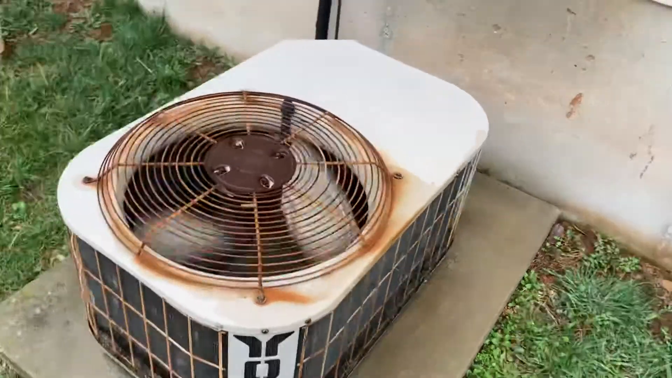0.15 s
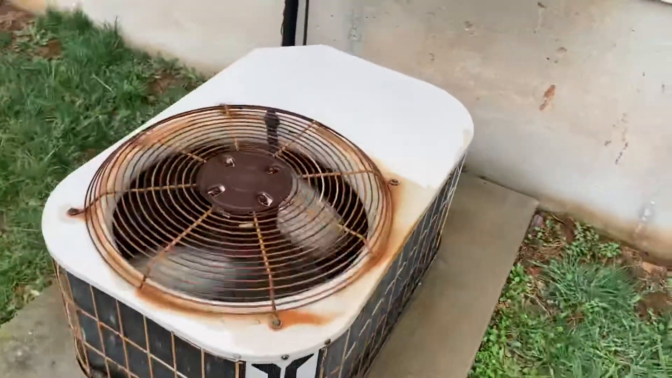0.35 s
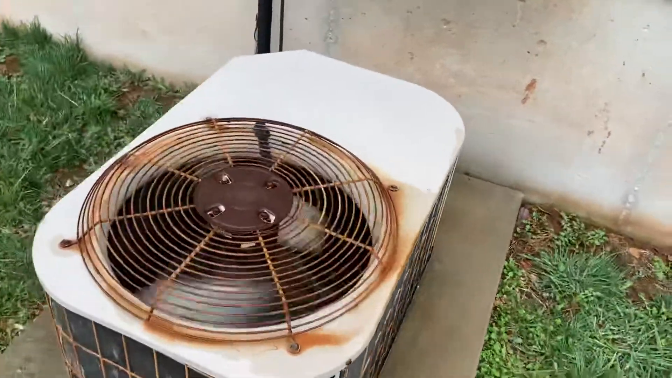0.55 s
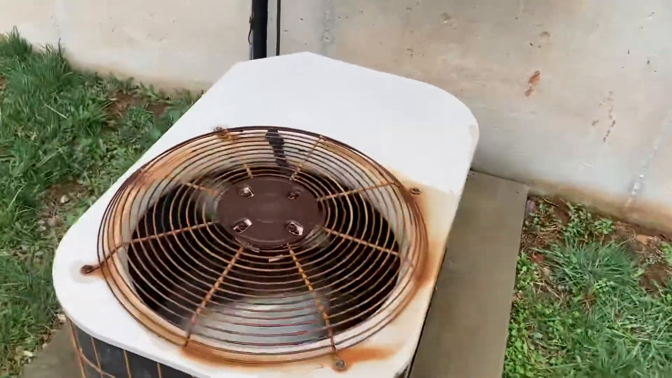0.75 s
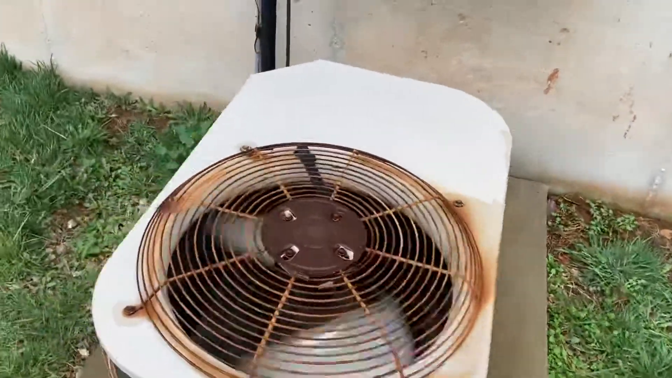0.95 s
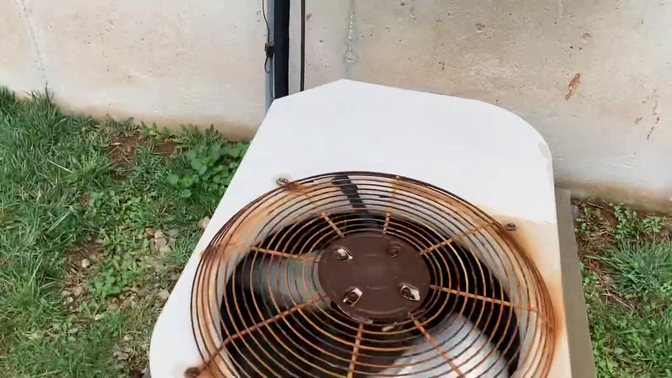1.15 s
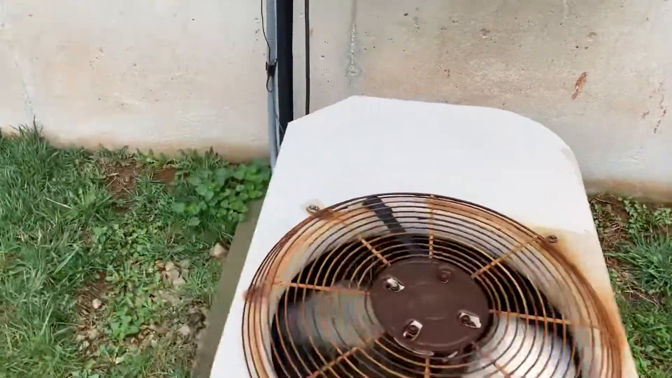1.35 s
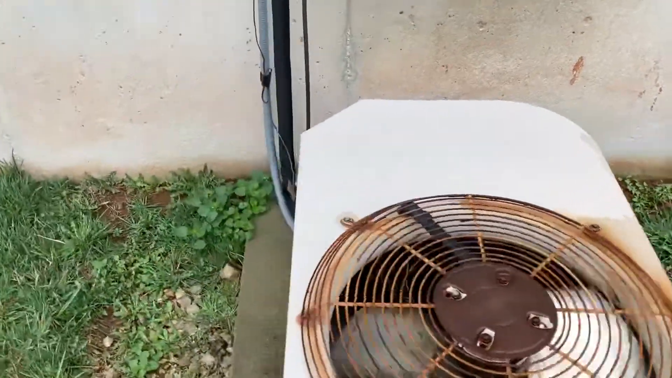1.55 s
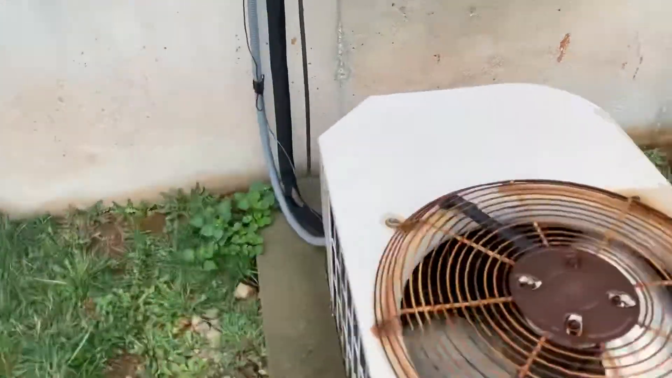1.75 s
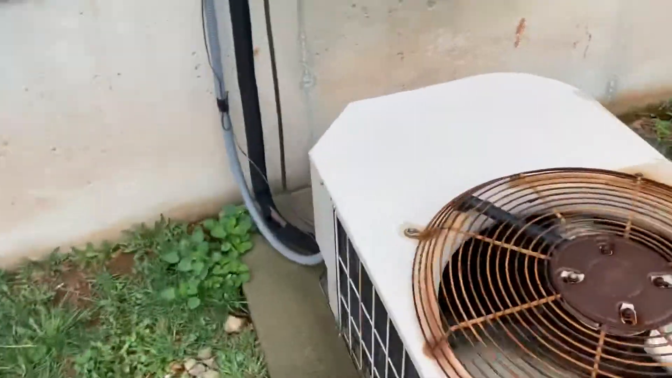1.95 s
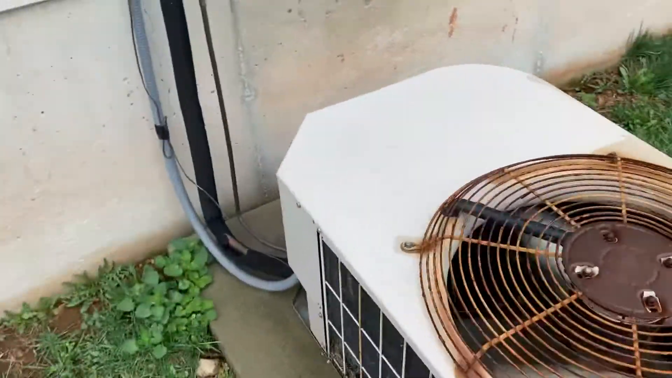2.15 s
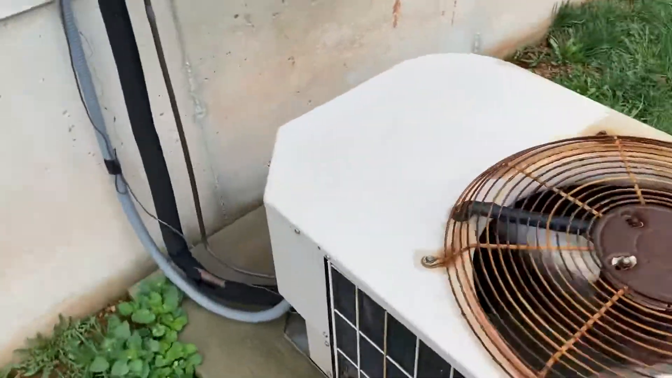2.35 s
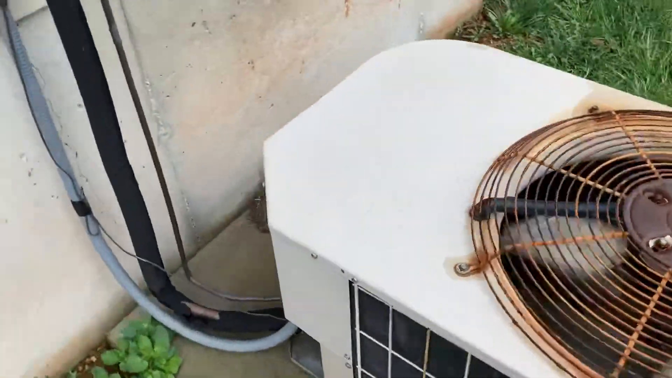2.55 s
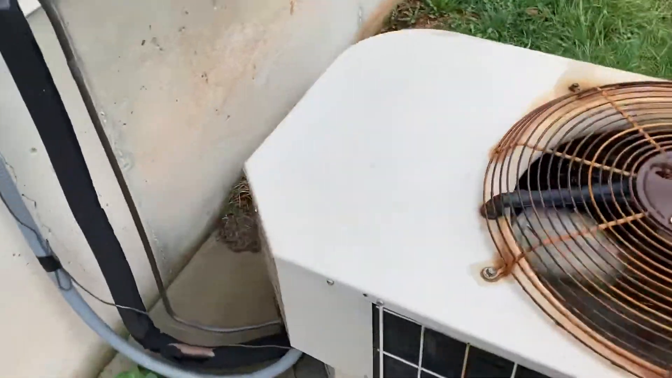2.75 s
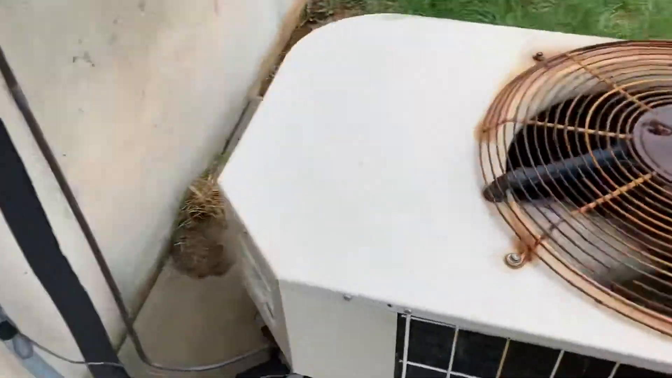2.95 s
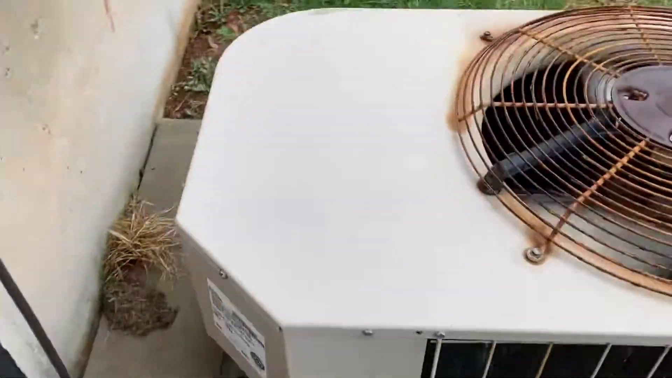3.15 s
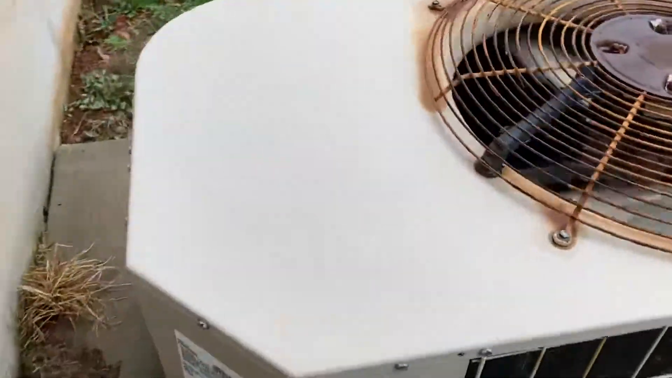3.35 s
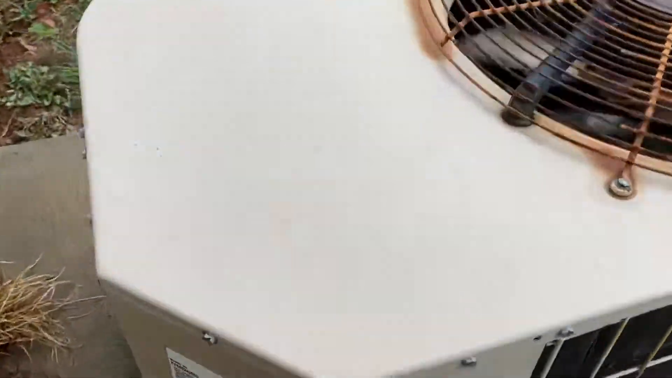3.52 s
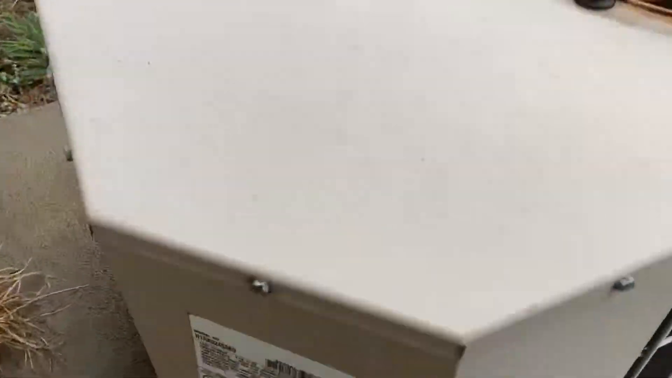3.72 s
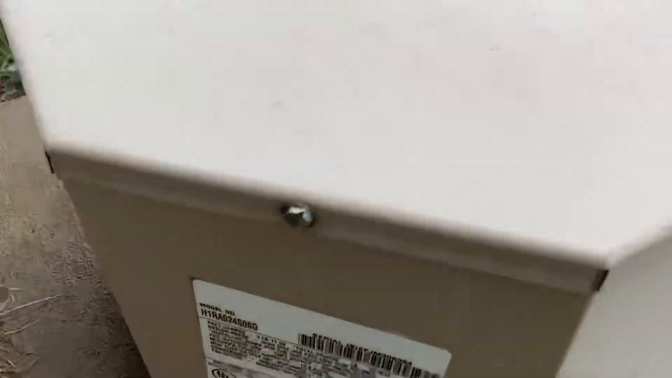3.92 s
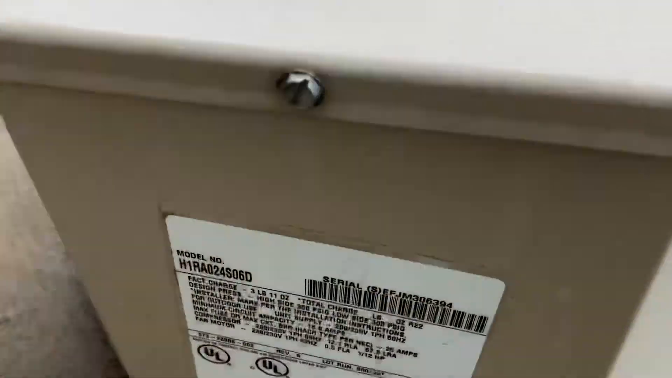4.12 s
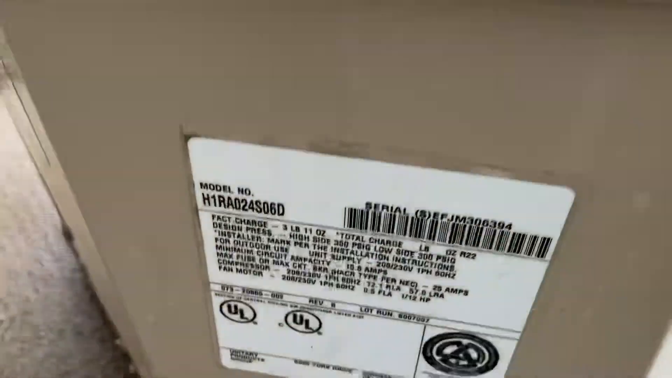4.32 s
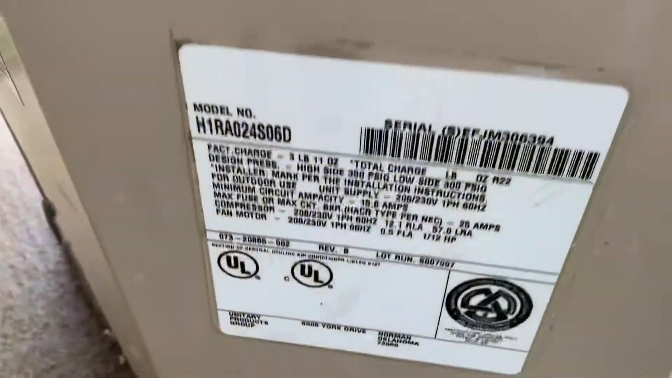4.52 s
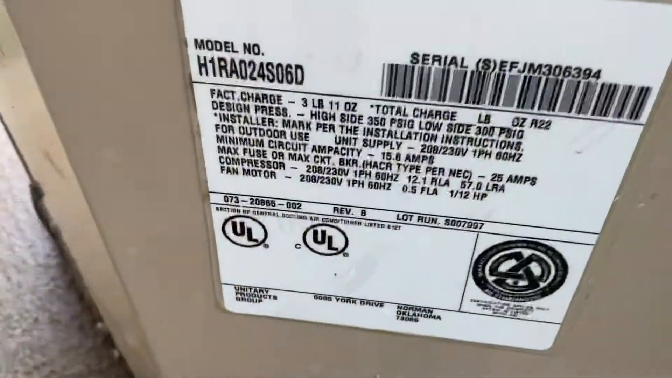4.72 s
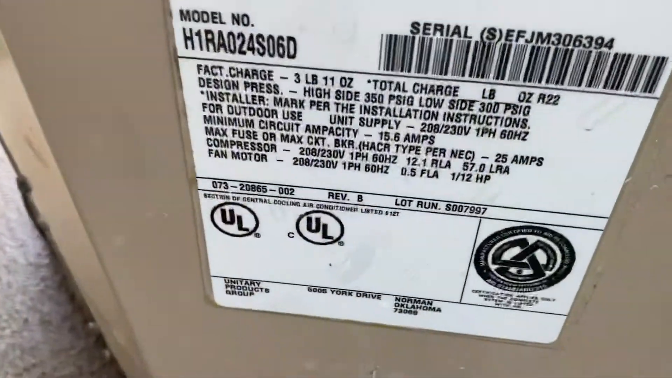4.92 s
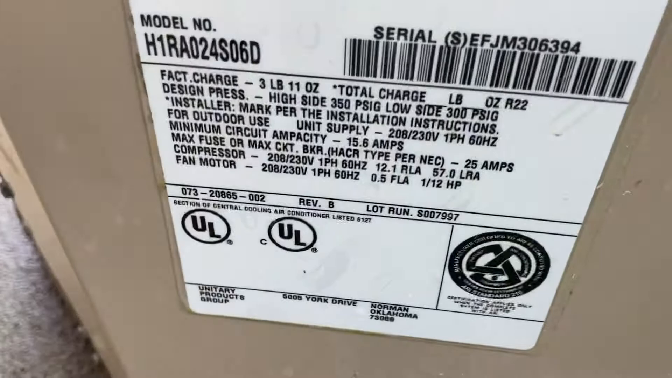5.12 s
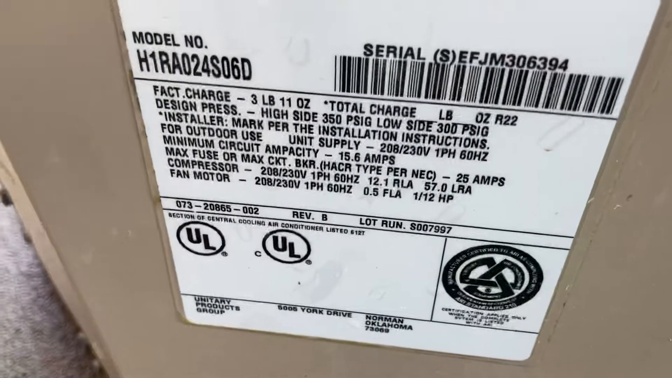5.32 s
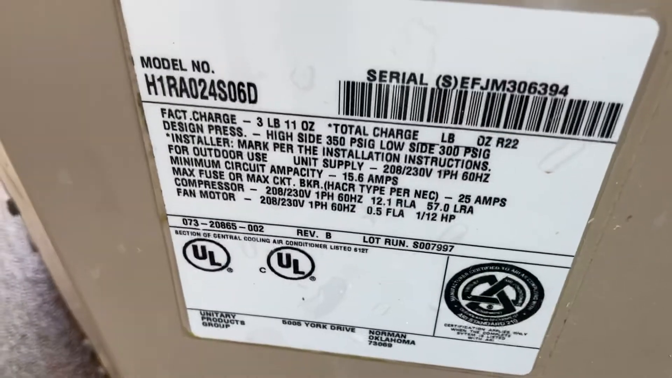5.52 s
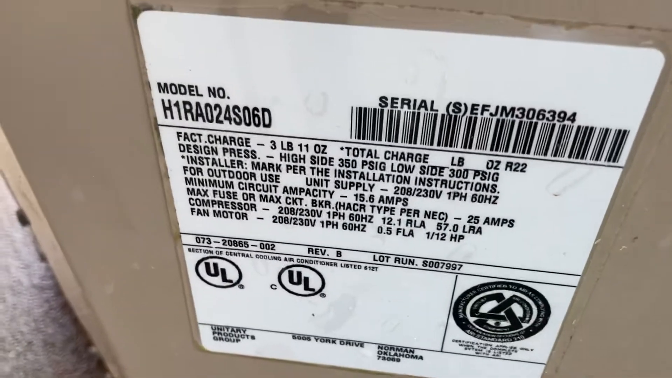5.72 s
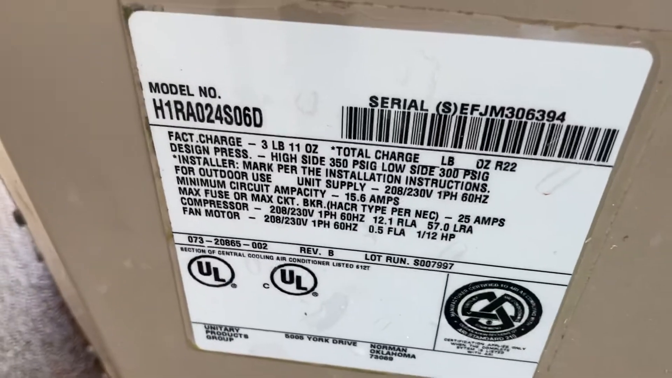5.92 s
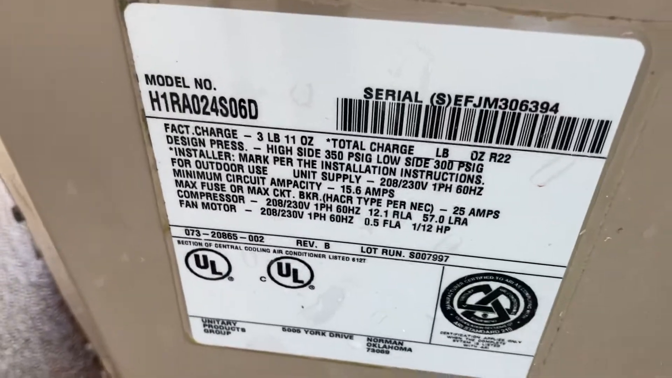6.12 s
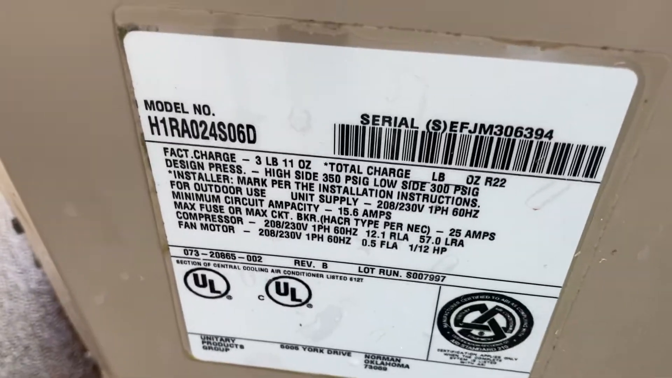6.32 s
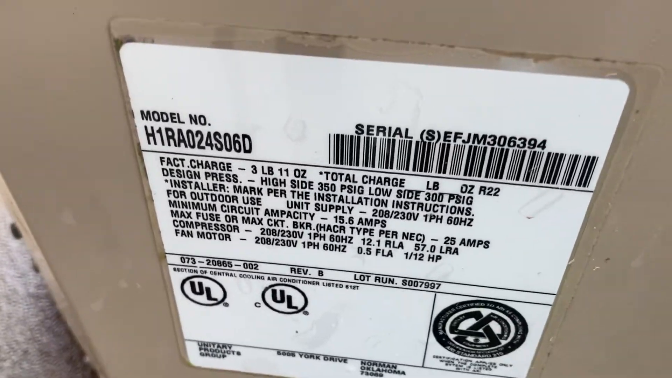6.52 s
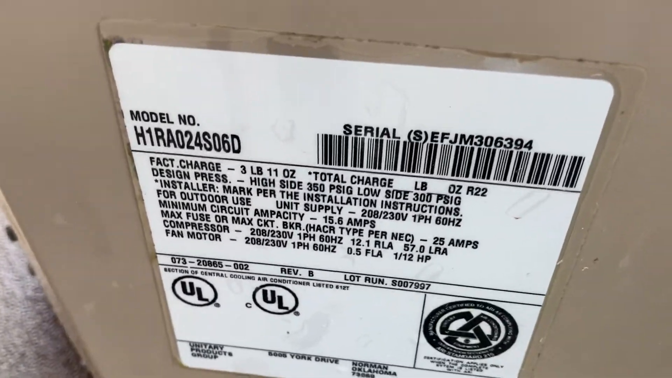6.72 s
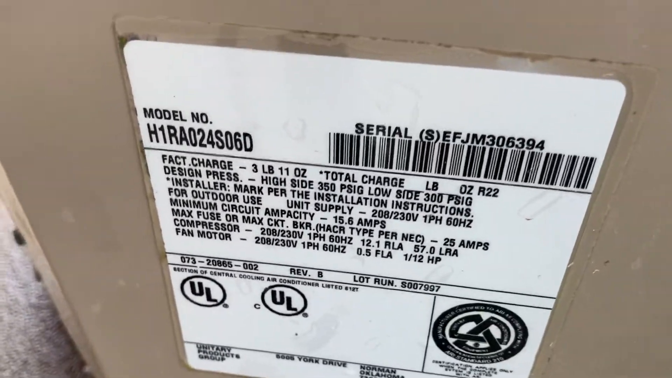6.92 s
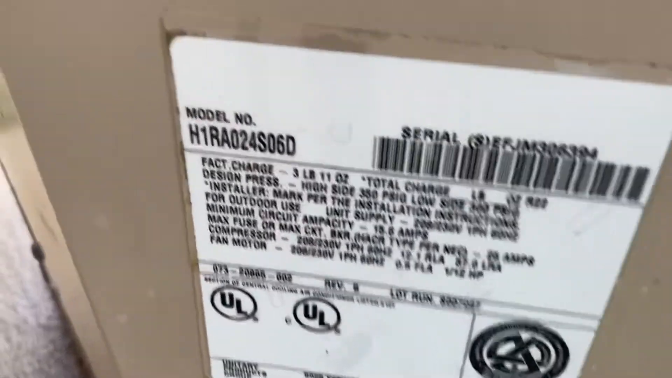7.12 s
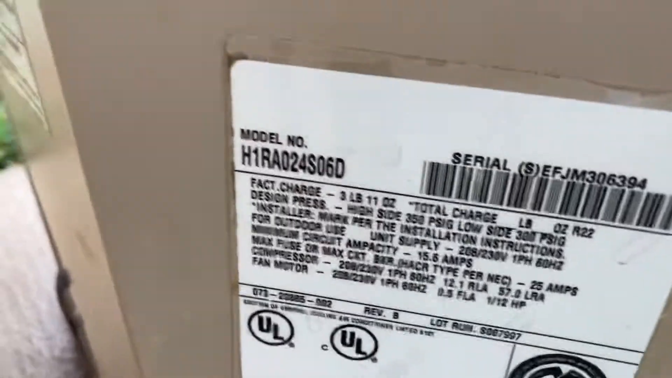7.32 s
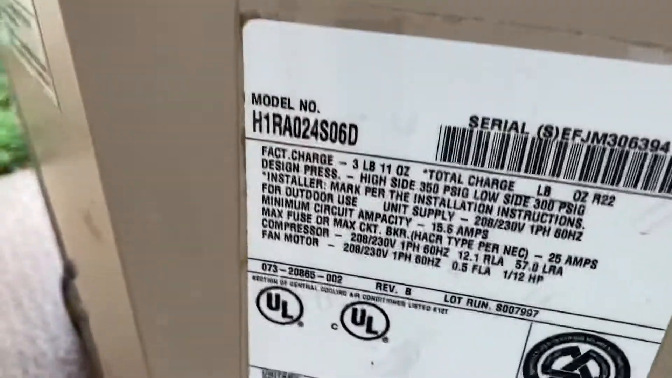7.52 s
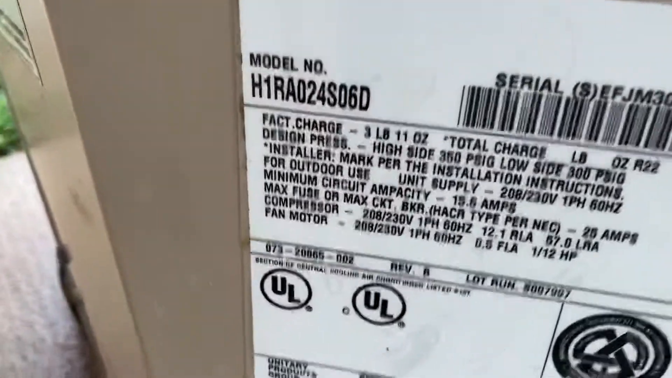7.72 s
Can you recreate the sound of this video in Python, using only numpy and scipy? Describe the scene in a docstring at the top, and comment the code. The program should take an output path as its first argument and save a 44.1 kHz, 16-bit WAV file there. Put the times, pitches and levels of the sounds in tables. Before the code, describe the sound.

Outdoors beside a house wall, a handheld phone passes over a running condenser unit. Fan air rushes over a buzzing compressor and faint metallic whine. From about one and a half seconds exhaust buffets the microphone in ragged low thumps, easing by four seconds. Small dry ticks and rustles follow, and close to the side panel the hum becomes deeper, stronger and steady.

```python
"""Walk past an outdoor condenser

A condenser unit runs steadily while a phone is carried over its fan grille, round a corner and down to
the side panel. The fan gives rushing air (shaped noise) and blade tones (sines on its shaft speed).
The compressor buzzes in partials of its shaft speed, hums, and rings the casing once a turn.
Exhaust buffets the microphone on the way past (low noise in gusts); dry ticks are tiny bursts of noise."""
import sys
import numpy as np
from scipy import signal
from scipy.fft import rfft, irfft, next_fast_len
from scipy.io import wavfile
from scipy.ndimage import uniform_filter1d, map_coordinates

SR = 44100
rng = np.random.default_rng(int(sys.argv[2]) if len(sys.argv) > 2 else 0)


def persist_wave(psi):
    """Save psi, clipped to +-1, as 16-bit WAV."""
    counts = np.round(np.clip(psi, -1, 1) * 32767).astype(np.int16)
    wavfile.write(sys.argv[1], SR, np.atleast_2d(counts).T)


N = 347067
TIME = np.arange(N) / SR
SIZE = next_fast_len(N, True)
FREQ = np.maximum(np.arange(SIZE // 2 + 1) * SR / SIZE, 1)
SIDES = np.array([[1], [-1]])  # left port, right port

FAN_HZ, COMPRESSOR_HZ = 17.33, 58.82  # shaft speeds, turns per second
TOP_HZ = 15900  # upper limit of the phone's band and of the buzz


def undb(db):
    """Decibels to gain."""
    return 10 ** (np.asarray(db) / 20)


def curve(table, axis=1):
    """One column of a table, joined by straight lines in time."""
    table = np.array(table, float)
    return np.interp(TIME, table[:, 0], table[:, axis])


def colour(table, hz, axis=1):
    """One column of a table, joined by straight lines over log frequency."""
    table = np.array(table, float)
    return np.interp(np.log(hz), np.log(table[:, 0]), table[:, axis])


def unit(x):
    """Scale to rms 1."""
    return x / np.sqrt(np.mean(x ** 2))


def white():
    """Spectra of two unrelated noises with power 1 per Hz."""
    return rfft(rng.standard_normal((2, SIZE))) * np.sqrt(SR / 2)


def sound(spectrum):
    """From a spectrum back to time."""
    return irfft(spectrum, SIZE)[..., :N]


def resonance(hz, width_hz):
    """Response of one damped mode, gain 1 at the centre."""
    return 1 / (1 + 1j * (FREQ / hz - hz / FREQ) * hz / width_hz)


def ringing_noise(hz, width_hz):
    """Stereo noise of rms 1 passed twice through one damped mode."""
    return unit(sound(white() * resonance(hz, width_hz) ** 2))


def wander(rate):
    """Random levels held 1 / rate s and slewed twice; spread 1."""
    hold = int(SR / rate)
    steps = np.repeat(rng.standard_normal(N // hold + 1), hold)
    smooth = uniform_filter1d(uniform_filter1d(steps, hold), hold)
    return unit(smooth[:N])


def shaft(hz, wobble):
    """Turns made by a motor whose speed wavers slightly at random."""
    return rng.random() + np.cumsum(hz * (1 + wobble * wander(3))) / SR


def tone(turns, lead):
    """A sine of rms 1 that reaches the left port earlier by lead radians."""
    return np.sqrt(2) * np.sin(2 * np.pi * (turns + rng.random()) + SIDES * lead / 2)


def swell(s, half):
    """A bell-shaped rise and fall around time s."""
    return np.exp(-.5 * ((TIME - s) / half) ** 2)


def at_place(place, levels_db):
    """Gain blended between the three places."""
    return np.interp(place, np.arange(3), undb(levels_db))


def ripple(spacing_hz):
    """Random hills and dips over frequency, left by the cabinet's many modes; they fade out in the bass."""
    knots = np.arange(0, SR / 2, spacing_hz)
    hills = rng.standard_normal(1000)[:len(knots)]
    return np.interp(FREQ, knots, hills) * np.minimum(FREQ / 2000, 1)


# dips beside the side panel: f/Hz, half width/Hz, level/dB
NOTCHES = [(2510, 28, -10), (2586, 35, -17), (3310, 150, -4.5), (3740, 170, -5), (5700, 200, -1.5)]


def notches(hz, k):
    """Loss in dB where the side panel's reflection cancels the direct sound; only at place k = 2."""
    return (k == 2) * sum(db * np.exp(-.5 * ((hz - centre) / half) ** 2) for centre, half, db in NOTCHES)


# fan air before ripple and trims: f/Hz, level/dB per Hz over the grille, at the corner, at the panel
AIR = [(20, -96, -72, -56), (55, -58, -54.5, -52.5), (95, -62, -57, -50.5), (137, -58.5, -58.5, -49.5),
       (184, -61.5, -57.5, -57), (267, -57, -63.5, -52.5), (351, -60.5, -65, -59), (402, -65.5, -70, -61.5),
       (488, -68, -65.5, -66.5), (830, -69, -72.5, -67), (1480, -69.5, -70.5, -69), (2100, -80.5, -76, -69),
       (2800, -80, -84.5, -75), (5500, -90.5, -91, -85), (9300, -98, -100, -105), (12400, -113, -109, -101),
       (13500, -101, -100, -101)]
# stereo width of the air: f/Hz, side minus mid level/dB over the grille, at the corner, at the panel
WIDTH = [(60, -6, -4, 1), (140, -18, 3.5, 4), (203, -11, 14.5, 14.5), (440, -17, -5.5, -5.5),
         (1020, -8.5, -10.5, -2), (1420, -12, 1.5, 3.5), (3040, 0.5, -5.5, 3.5), (11400, 5.5, 7.5, 10.5)]
# the two ports hear the same air out of step: f/Hz, quadrature share [-1..1]
SKEW = [(60, -0.3), (125, 0.81), (210, 0.19), (300, -0.6), (480, -0.16), (1600, -.5), (3200, 0.052),
        (8000, 0)]
EDGE_RUSH_DB = 2.5  # lift of all the air at the edge of the exhaust jet


def air(place, fan_turns, split_hz=2200, surge_db=0.5, ripple_db=1.0, hiss_db=-1.5, flicker_db=2.3,
        throb=0.35, chop=0.14):
    """Turbulence through the coil and grille; its colour depends on where the phone is."""
    skew = np.clip(colour(SKEW, FREQ), -1, 1)
    low_share = 1 / (1 + (FREQ / split_hz) ** 4)
    rush, hiss = 0, 0
    for k in range(3):
        mid, own = white()
        width = undb(colour(WIDTH, FREQ, axis=k + 1))
        side = width * (1j * skew * mid + np.sqrt(1 - skew ** 2) * own)
        shape = undb(colour(AIR, FREQ, axis=k + 1) + ripple_db * ripple(217.7) + notches(FREQ, k))
        ports = (mid + SIDES * side) / np.sqrt(1 + width ** 2) * shape
        near = np.sqrt(np.maximum(1 - abs(place - k), 0))  # equal-power crossfade between places
        rush = rush + near * sound(ports * low_share)
        hiss = hiss + near * sound(ports * (1 - low_share))
    # the hiss flickers, and throbs with each turn and half turn of the fan
    turn_angle = 2 * np.pi * fan_turns
    hiss = hiss * undb(hiss_db + flicker_db * wander(28))
    hiss = hiss * (1 + throb * np.sin(turn_angle) + chop * np.sin(2 * turn_angle))
    at_edge = sum(swell(s, half) for s, half, _ in CROSSINGS)
    return (rush + hiss) * undb(EDGE_RUSH_DB * at_edge + surge_db * wander(6))


# modes of the cabinet: f/Hz, width/Hz, level/dB over the grille, at the corner, at the panel
CABINET = [(2447, 72, -63, -54.5, -61), (2930, 280, -61, -61, -68), (3540, 300, -79, -68, -55),
           (4320, 150, -60, -62.5, -62.5), (6050, 310, -78, -69, -63.5), (6690, 280, -61, -62.5, -67),
           (7270, 840, -59, -59, -58.5), (10950, 1330, -54.5, -56, -58)]


def cabinet(place, swell_db=3.0):
    """Turbulence rings the cabinet's modes; each swells and sinks on its own as the flow shifts."""
    out = 0
    for hz, width_hz, *levels_db in CABINET:
        ring = ringing_noise(hz, width_hz)
        out = out + ring * at_place(place, levels_db) * undb(swell_db * wander(6.5))
    return out


# sliding dip where the lid's reflection cancels the rush (above 0 dB a lift): t/s, f/Hz, level/dB
LID_DIP = [(0, 2270, -1.5), (.7, 2040, -5), (1.5, 2080, 1.5), (1.85, 2300, -7), (2.1, 2650, -3.5),
           (2.9, 2680, -4), (3.1, 2070, -7), (3.35, 2100, -11), (3.55, 2000, -9)]
LID_DIP_HALF_HZ = 213
# bands shaded by the cabinet's edge: t/s, half length/s, f/Hz, half width/Hz, level/dB
SHADOWS = [(2.096, 0.12, 5700, 400, -17), (2.65, 0.19, 7100, 700, -5.5), (2.778, 0.16, 4100, 700, -6.5),
           (3.745, 0.11, 3760, 450, -5)]


def passing(x, place, drift_db=2.35, size=1024):
    """Reflections and shadows recolour the rush as the phone moves; beside the panel the colour settles."""
    hz, t, bands = signal.stft(x, SR, nperseg=size)
    hz = hz[:, None]
    times, dip_hz, dip_db = np.array(LID_DIP, float).T
    dip_offset = (hz - np.interp(t, times, dip_hz)) / LID_DIP_HALF_HZ
    db = np.interp(t, times, dip_db) * np.exp(-.5 * dip_offset ** 2)
    for s, half, centre, half_hz, depth_db in SHADOWS:
        db = db + depth_db * np.exp(-.5 * (((t - s) / half) ** 2 + ((hz - centre) / half_hz) ** 2))
    # smaller hills and dips come and go at random, mostly in the treble
    drift = rng.standard_normal(db.shape)
    for _ in range(2):
        drift = uniform_filter1d(uniform_filter1d(drift, size=4, axis=0), size=30, axis=1)
    moving = np.clip(2 - np.interp(t, TIME, place), 0, 1)
    db = db + drift_db * unit(drift) * moving * np.minimum(hz / 2000, 1)
    return signal.istft(bands * undb(db), SR, nperseg=size)[1][:, :N]


# fan tones: multiple of the shaft speed, level/dB re the blade tone, left lead at the panel/rad
BLADES = [(2, -10, -0.4), (4, 0, 0.4), (6, -16, 1.2), (8, -18, 1.6), (10, -19, 2.4), (12, -20, 3.0),
          (14, -25, -2.1), (16, -21, -2.0)]
# the blade tone along the walk, strongest low down at the panel: t/s, level/dB
BLADE_LEVEL = [(0, -38.5), (1.6, -36), (2.2, -50), (3.1, -48), (3.7, -37.5), (4.05, -30), (4.3, -28.5),
               (4.55, -25.5), (6.5, -25.8), (7.87, -24)]


def fan(place, turns, unsteady_db=0.95, right_db=2.5, deepest_loss_db=4):
    """Blade tones, a little louder on the right; uneven inflow makes each waver, the upper ones more."""
    out = 0
    for multiple, db, lead in BLADES:
        waver_db = unsteady_db * np.sqrt(multiple / 4) * wander(9)
        # the deepest tone carries only near the panel
        loss_db = (multiple == 2) * deepest_loss_db * (2 - place)
        out = out + undb(db + waver_db - loss_db) * tone(multiple * turns, lead * place / 2)
    return out * undb(curve(BLADE_LEVEL)) * undb(-SIDES * right_db / 2)


# strong compressor partials: multiple of the shaft speed,
# level/dB over the grille, at the corner, at the panel, left lead away from the grille/rad
PARTIALS = [(1, -49.0, -45.0, -39.0, 0.5), (3, -64.0, -62.0, -51.0, 2.5), (4, -33.4, -42.0, -44.0, -2.9),
            (6, -47.0, -47.0, -48.0, -0.9), (8, -69.0, -65.0, -53.0, 0.4), (9, -52.0, -65.0, -52.0, -1.6),
            (11, -57.0, -60.0, -51.0, -1.3), (15, -61.0, -54.0, -53.0, -2.1),
            (16, -57.0, -63.0, -45.0, 2.8), (19, -54.0, -57.0, -43.7, 0.7), (22, -47.0, -53.0, -48.0, -1.8),
            (23, -49.0, -49.0, -48.0, -2.4), (26, -61.0, -60.0, -55.0, 0.7), (29, -63, -63, -51.5, -2.2),
            (31, -61, -61, -46.5, -1.7), (34, -70, -66, -59, -2.0), (41, -67, -64, -60, -1.5),
            (48, -61, -74, -61, -2.0), (50, -62, -67, -64, -2.0), (58, -65, -67, -56, -2.4),
            (62, -66, -66, -61, -1.7), (73, -65, -71, -63, -1.4), (74, -65, -68, -68, -0.3),
            (79, -72, -77, -66, -0.1), (103, -77, -74, -69, 0), (113, -67, -79, -68, 0.0),
            (114, -69, -70, -69, 0.3), (122, -72, -71, -65, 0.4), (186, -73, -76, -70, 0)]
# all its other partials, before scatter: f/Hz, level/dB each over the grille, at the corner, at the panel
BUZZ = [(400, -67, -66, -66), (1200, -59, -59, -57), (2200, -75, -70, -67), (3200, -70, -73, -65),
        (4400, -73, -75, -67), (5600, -83, -82, -78), (7000, -77, -78, -73), (8700, -86, -87, -85),
        (11000, -79, -80, -78), (13000, -86, -86, -84), (15000, -93, -90, -88)]
# partials that swell as the phone passes a standing-wave peak: t/s, half length/s, multiple, level/dB
ANTINODES = [(1.25, .35, 48, -66), (1.5, .15, 74, -66), (1.9, .14, 58, -63), (1.4, .17, 58, -66),
             (2.28, .08, 74, -64), (2.0, .07, 6, -47), (2.28, .04, 6, -49), (2.43, .03, 6, -39),
             (2.67, .055, 6, -45.5), (2.93, .05, 6, -42.5), (3.13, .05, 6, -46), (3.3, .12, 2, -35),
             (3.5, .15, 41, -61), (3.75, .25, 19, -56), (4.25, .17, 122, -62), (4.35, .17, 48, -57.5),
             (4.76, .16, 48, -54), (4.85, .3, 79, -67), (7.6, .2, 74, -63), (6.8, .9, 4, -42)]
FLUTTER_DB, FADE_DB = 2.6, 1.8  # quick and slow wavering, before the shares set in buzz()


def buzz(place, turns, scatter_db=1.0, fade_hz=4000, strong_share=0.7, antinode_lead=0.45,
         size=4096, count=200):
    """The compressor's partials; each place has its own standing waves, and each partial wavers alone."""
    multiples = np.arange(1, int(TOP_HZ / COMPRESSOR_HZ))
    hz = multiples * COMPRESSOR_HZ
    strong = np.array(PARTIALS, float)
    index = strong[:, 0].astype(int) - 1
    # level and phase by (place, port, partial)
    levels = np.array([[colour(BUZZ, hz, axis=k + 1) + notches(hz, k)] for k in range(3)])
    levels = levels + scatter_db * rng.standard_normal((3, 2, len(multiples)))
    phases = rng.uniform(0, 2 * np.pi, levels.shape)
    levels[:, :, index] = strong[:, 1:4].T[:, None]
    # over the grille both ports hear a strong partial in step; beside the unit one leads
    leads = np.array([0, 1, 1])[:, None, None] * SIDES * strong[:, 4] / 2
    phases[:, :, index] = phases[0, 0, index] + leads
    moments = np.linspace(0, N - 1, count).astype(int)
    near = np.maximum(1 - abs(place[moments, None] - np.arange(3)), 0)
    quick, slow = rng.standard_normal((2, count, 1, len(multiples)))
    waver_db = FLUTTER_DB * quick
    # strong, low partials hold steadier
    waver_db[:, :, index] *= strong_share + (1 - strong_share) * np.minimum(hz[index] / TOP_HZ, 1)
    # short waves fade in and out most with the sway of the hand
    waver_db += FADE_DB * np.minimum(hz / fade_hz, 1) * unit(uniform_filter1d(slow, size=7, axis=0))
    gains = undb(np.tensordot(near, levels, 1) + waver_db)
    partials = gains * np.exp(1j * np.tensordot(near, phases, 1))
    # single partials sing out and fade as the phone moves through their standing waves
    for s, half, multiple, db in ANTINODES:
        k = int(multiple) - 1
        phasor = np.exp(1j * (phases[0, 0, k] + SIDES.T * antinode_lead / 2))
        partials[:, :, k] += undb(db) * swell(s, half)[moments, None] * phasor
    # one waveform cycle per moment, read out at the shaft's angle and blended to the next
    cycles = irfft(np.pad(partials, ((0, 0), (0, 0), (1, 0))), size) * size / np.sqrt(2)
    at = [np.linspace(0, count - 1, N), (turns % 1) * size]
    return np.array([map_coordinates(cycles[:, port], at, order=1, mode="nearest") for port in range(2)])


# the deep hum: level/dB over the grille, at the corner, at the panel
MOTOR_DB = (-39, -41, -28.5)


def motor_hum(place, turns, lead=1.66, waver_db=0.1):
    """The compressor's deep hum at twice its shaft speed."""
    return tone(2 * turns, lead * place / 2) * at_place(place, MOTOR_DB) * undb(waver_db * wander(5.1))


# the casing's whine, before ring_db and the rattle: t/s, level/dB
WHINE = [(0, -44), (.17, -46), (.4, -62), (1.2, -46.5), (1.8, -52.5), (3.8, -54), (4.1, -42.5), (5, -44),
         (7.87, -43.5)]


def casing(turns, fan_turns, chop=0.041, width_hz=18, rattle=0.51, rattle_width_hz=170, ring_db=2.0,
           lead=-1.27, uneven_db=1.5, order=30):
    """Uneven strokes ring a shell mode on a shaft multiple and rattle it; the fan blades chop the whine."""
    ring_hz = order * COMPRESSOR_HZ
    strokes = rfft(np.exp(-(turns % 1) / 0.01) * undb(uneven_db * wander(70)), SIZE)
    shell = resonance(ring_hz, width_hz) * resonance(1800, 230)
    ring = unit(sound(strokes * shell * np.exp(.5j * SIDES * lead)))
    # a burst of noise on each turn, fading until the next
    chatter = rng.standard_normal((2, N)) * np.exp(-(turns % 1) / .5)
    chatter = unit(sound(rfft(chatter, SIZE) * resonance(1800, rattle_width_hz) ** 2))
    flutter = 1 + chop * np.sin(2 * np.pi * 2 * fan_turns)
    return (ring + rattle * chatter) * flutter * undb(curve(WHINE) + ring_db)


# dry ticks: t/s, peak of the envelope level/dB
TICKS = [(2.776, -49), (2.830, -46), (2.889, -45), (2.949, -41), (3.336, -48), (3.805, -43), (3.85, -42),
         (3.8667, -29), (3.921, -39), (3.981, -34), (4.038, -43), (4.152, -42), (4.212, -44), (4.2665, -43),
         (4.384, -47), (6.538, -50), (6.572, -50), (7.107, -49), (7.2195, -39)]


def ticks(tick_hz=13300, width_hz=4600, rise_s=0.00042, decay_s=0.0013, rustle_db=-63.0, crumple_db=5,
          shuffle_db=-70):
    """Tiny bright snaps of noise in a faint, patchy rustle, like dry grass underfoot."""
    snaps = sum(undb(db) * np.exp(-np.maximum((s - TIME) / rise_s, (TIME - s) / decay_s))
                for s, db in TICKS)
    rustle = undb(rustle_db) * swell(4.2, 0.13) + undb(shuffle_db)
    rustle = rustle * undb(crumple_db * wander(250))
    return (snaps + rustle) * unit(sound(white() * resonance(tick_hz, width_hz)))


# the phone crosses the edge of the exhaust jet, in and out: t/s, half length/s, hiss level/dB
CROSSINGS = [(1.447, 0.57, -48.5), (3.303, 0.67, -50)]


def jet_edge(edge_hz=3780, width_hz=1740):
    """The sheared rim of the exhaust jet hisses while the phone is in it."""
    hiss = ringing_noise(edge_hz, width_hz)
    return hiss * sum(undb(db) * swell(s, half) for s, half, db in CROSSINGS)


def wind(corner_hz, low_hz=42, apart=0.36, steep=5.53):
    """Pressure of turbulent air on the two ports: a rumble that falls steeply above its corner."""
    mid, side = white()
    shape = 1 / np.sqrt(1 + (FREQ / corner_hz) ** steep)
    shape = shape / np.sqrt(1 + (low_hz / FREQ) ** 6)
    return unit(sound((mid + apart * SIDES * side) * shape))


def gust(start, rise, length, release):
    """A rise, a hold and a dying away."""
    age = TIME - start
    return np.clip(age / rise, 0, 1) * np.exp(-(np.maximum(age - length, 0) / release) ** 2)


# gusts of exhaust on the microphone: start t/s, rise/s, length/s, dying away/s, level/dB
GUSTS = [(1.652, .012, 0.18, 0.053, -20), (1.857, 0.035, 0.27, 0.13, -26.5),
         (2.16, 0.018, 0.087, .035, -31), (2.39, 0.034, 0.13, .02, -28), (2.595, 0.014, 0.027, 0.016, -26),
         (2.75, .02, 0.034, 0.026, -32), (2.91, 0.015, 0.042, .025, -37), (3.13, 0.14, 0.25, .15, -27.5),
         (3.52, .02, 0.16, .025, -33), (3.71, .02, .1, .04, -33.5)]
# the strongest eddies, landing as soft knocks: t/s, half length/s, level/dB, corner f/Hz
EDDIES = [(1.44, 0.013, -20, 100), (1.534, 0.018, -23, 104), (1.664, 0.01, -15, 120),
          (1.7, 0.013, -19.5, 170), (1.775, 0.0085, -16.5, 120), (1.799, 0.0077, -17, 273),
          (1.826, 0.012, -14.5, 192), (1.94, 0.009, -24, 110), (2.05, 0.0096, -18.5, 103),
          (2.093, 0.0066, -20.5, 119), (2.135, 0.0043, -21, 189), (2.491, 0.0072, -21.5, 110),
          (3.339, 0.005, -26.5, 170), (3.46, 0.0075, -20.5, 135), (3.534, 0.015, -19.5, 154),
          (3.63, 0.011, -14, 175), (3.664, 0.011, -17, 75)]


def buffets(ragged_db=1.1, stream_hz=110, size=2600):
    """Exhaust blows across the microphone in ragged gusts, with single eddies landing as soft knocks."""
    stream = wind(stream_hz)
    # the fan feeds the stream evenly, so it has no long lulls
    stream = stream / np.sqrt(uniform_filter1d(np.mean(stream ** 2, axis=0), size))
    gusts = sum(undb(db) * gust(s, rise, length, release) for s, rise, length, release, db in GUSTS)
    out = stream * gusts * undb(ragged_db * wander(35.13))
    for s, half, db, corner_hz in EDDIES:
        shape = swell(s, half)
        eddy = wind(corner_hz) * shape
        out = out + undb(db) * eddy * np.sqrt(np.mean(shape ** 2) / np.mean(eddy ** 2))
    return out


# hollow notes of the gaps around the cabinet: t/s, half length/s, f/Hz, width/Hz, level/dB
HOLLOWS = [(2.4, 0.38, 1110, 500, -39.5), (2.697, 0.17, 1990, 450, -53), (3.05, 0.35, 517, 110, -44),
           (3.6, 0.24, 2420, 500, -53), (3.707, 0.29, 1670, 350, -43.5), (3.7, 0.25, 710, 120.4, -39),
           (7.6, .25, 5060, 300, -54)]


def hollows():
    """The rush takes on passing hollow notes as the phone moves between cabinet and wall."""
    return sum(ringing_noise(hz, width_hz) * swell(s, half) * undb(db)
               for s, half, hz, width_hz, db in HOLLOWS)


# the walk: t/s, place [0 over the grille, 1 at the corner, 2 at the side panel]
WALK = [(0, 0), (1.65, 0), (2.2, 1), (3.25, 1), (3.7, 1.2), (4.05, 1.7), (4.35, 2), (7.87, 2)]


def scene():
    """Fan and compressor, heard along the walk."""
    place = curve(WALK)
    fan_turns = shaft(FAN_HZ, wobble=0.0011)
    piston_turns = shaft(COMPRESSOR_HZ, wobble=0.0002464)
    rush = passing(air(place, fan_turns) + cabinet(place) + jet_edge(), place) + hollows()
    compressor = buzz(place, piston_turns) + motor_hum(place, piston_turns)
    compressor = compressor + casing(piston_turns, fan_turns)
    return rush + fan(place, fan_turns) + compressor + buffets() + ticks()


def record(dry, right_db=0.5, balance_hz=1600):
    """The right port is a little stronger below the treble; the phone cuts the deepest rumble and the top."""
    tilt_db = -SIDES * right_db / 2 / (1 + (FREQ / balance_hz) ** 2)
    dry = sound(rfft(dry, SIZE) * undb(tilt_db))
    dry = signal.sosfilt(signal.butter(2, 20, "high", fs=SR, output="sos"), dry)
    return signal.sosfilt(signal.ellip(10, .2, 80, TOP_HZ, fs=SR, output="sos"), dry)


dry = scene()
out = record(dry)
persist_wave(out)
```